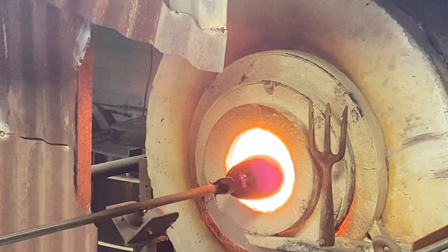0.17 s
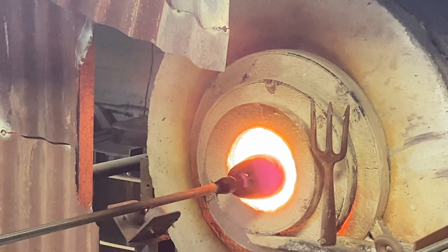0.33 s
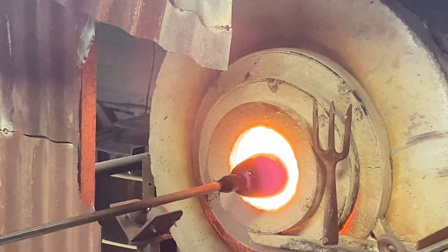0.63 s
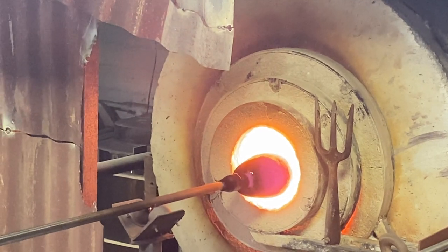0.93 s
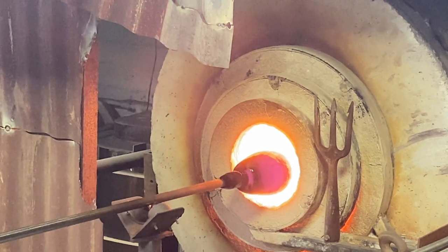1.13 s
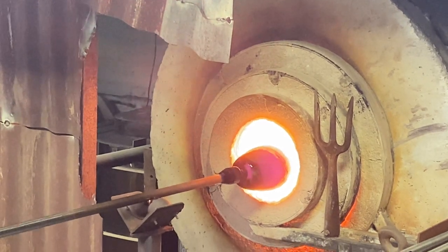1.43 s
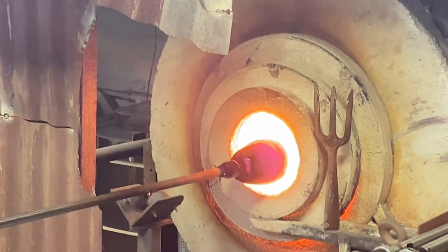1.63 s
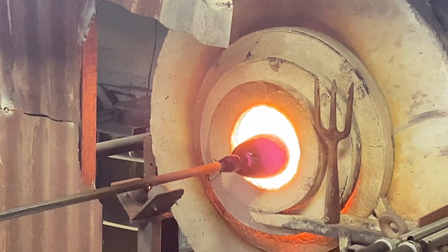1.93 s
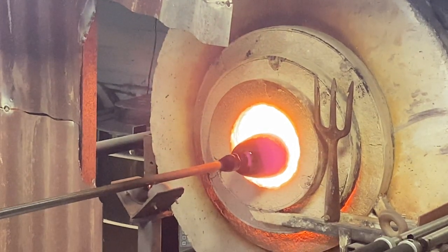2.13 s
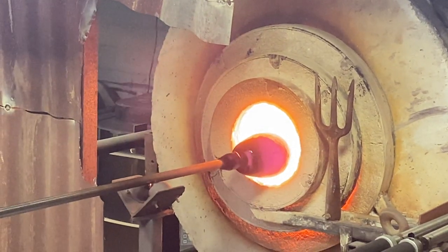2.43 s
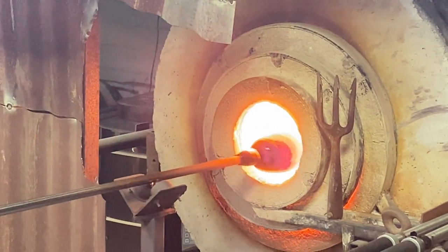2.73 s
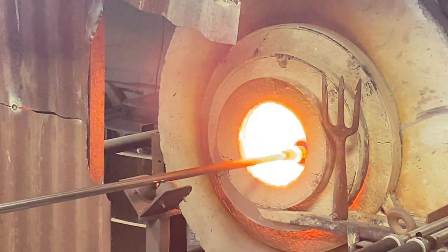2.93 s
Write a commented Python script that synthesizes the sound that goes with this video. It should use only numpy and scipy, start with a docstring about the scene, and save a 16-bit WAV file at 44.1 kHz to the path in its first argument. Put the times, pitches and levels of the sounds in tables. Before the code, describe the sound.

A gas-fired glass furnace roars close by throughout, with a throbbing low rumble, a steady blower hum and a soft hiss. A steel blowpipe turning on its rest makes faint scuffs in the first half second and rubs lightly from about 1.2 to 1.9 seconds, with a sharper scuff near 1.7. From 2.6 seconds the pipe slides in with a ringing scrape, loudest near 2.9 and lasting to the end.

```python
"""A glass workshop, close to a gas-fired furnace. The turbulent gas jet hisses, the blower hums at its
blade tone, and combustion noise roars and booms in the resonances of the chamber and the furnace mouth.
A steel blowpipe turns on its rest with a few light scuffs, then is pushed into the furnace with one long
ringing scrape, as stick-slip friction excites the pipe's modes."""
import sys
import numpy as np
from scipy import signal
from scipy.fft import rfft, irfft, next_fast_len
from scipy.io import wavfile
from scipy.ndimage import map_coordinates

SR = 44100
rng = np.random.default_rng(int(sys.argv[2]) if len(sys.argv) > 2 else 0)


def waveform_to_disk(signal):
    """Save audio, clipped to [-1, 1], as 16-bit WAV at the path in sys.argv[1]."""
    frames = np.transpose(np.atleast_2d(signal))
    scaled = np.clip(frames, -1, 1) * 32767
    samples = np.round(scaled).astype(np.int16)
    wavfile.write(sys.argv[1], SR, samples)


N = 136269
TIME_S = np.arange(N) / SR


def amp(db):
    """Amplitude ratio of a level in decibels."""
    return 10 ** (np.asarray(db) / 20)


def unit(x):
    """Normalisation to an rms of 1."""
    return x / np.sqrt(np.mean(x ** 2) + 1e-20)


def along(points, hz):
    """Interpolation of (Hz, value) points on a logarithmic frequency axis."""
    f, value = np.transpose(points)
    return np.interp(np.log(hz + 1), np.log(f + 1), value)


def wobble(knots_per_s):
    """Smooth random modulation: a spline through Gaussian knots."""
    knots = rng.standard_normal(int(N * knots_per_s / SR) + 4)
    return map_coordinates(knots, [TIME_S * knots_per_s])


def filtered(x, response):
    """Linear filtering: the spectrum of x times a complex frequency response."""
    size = next_fast_len(N + SR // 2)
    return irfft(rfft(x, size) * response(np.fft.rfftfreq(size, 1 / SR)), size)[..., :N]


def resonance(f, hz, width):
    """Response of two identical damped resonators in cascade, each of the given bandwidth in Hz."""
    return (1j * f * width / (hz * hz - f * f + 1j * f * width)) ** 2


def noise():
    """Two uncorrelated white noises."""
    return rng.standard_normal((2, N))


def coloured(x, spectrum):
    """Spectral shaping of x by (Hz, dB) points, at an rms of 1."""
    return unit(filtered(x, lambda f: amp(along(spectrum, f))))


def gas_jet():
    """Turbulence in the stream of gas and air radiates a nearly steady broadband hiss."""
    # Each row: frequency in Hz, relative spectral density in dB.
    hiss_spectrum = [(300, -4), (900, 6), (1400, 3), (2400, -3), (3600, -7.5), (4100, -8), (5500, -8),
                     (7500, -14.5), (11000, -23), (16000, -34)]
    level_db = -44.5 + 0.13 * wobble(5.7)
    return amp(level_db) * coloured(noise(), hiss_spectrum)


def blower():
    """Periodic blade passage gives a tone, slightly unsteady in pitch and level."""
    blade_hz = 356.6 + 0.97 * wobble(10)
    level_db = -31.5 + .4 * wobble(8.2)
    phase = 2 * np.pi * np.cumsum(blade_hz) / SR
    return amp(level_db) * np.sqrt(2) * np.array([np.sin(phase), np.cos(phase)])


def forced_modes(modes):
    """Forced resonance: independent combustion noise drives each mode of a table."""
    return sum(amp(db) * unit(filtered(noise(), lambda f: resonance(f, hz, 1.295 * width)))
               for hz, width, db in modes)


def chamber_throb():
    level_db, compression = -25, .35
    analytic = signal.hilbert(filtered(noise(), lambda f: resonance(f, hz=116.6, width=27.4)))
    envelope = np.abs(analytic) + 1e-9
    return amp(level_db) * unit(analytic.real / envelope ** compression)


def flame():
    """Combustion noise roars and excites cavity resonances; the bass swells and sinks with the boom."""
    # Each row: frequency in Hz, relative spectral density in dB.
    roar_spectrum = [(20, -16), (42, -9), (58, -3.5), (90, -4), (150, -3.5), (200, -6), (235, -9),
                     (330, -6.5), (385, -13), (520, -16), (580, -21), (700, -18.5), (900, -41),
                     (1300, -58.5)]
    # Each row: time in seconds, boom contour in dB, whose swings are scaled down below.
    boom_contour = [(0.0, -20.5), (0.28, -29.5), (0.38, -20.5), (0.42, -32), (0.47, -19), (0.51, -25),
                    (0.73, -25.5), (0.82, -21.5), (1.23, -25), (1.29, -16), (1.32, -36.5), (1.38, -14),
                    (1.41, -30), (1.45, -17), (1.63, -31.5), (1.65, -20), (1.74, -28.5), (1.77, -18.5),
                    (1.87, -30.5), (1.95, -29), (1.97, -22), (2.13, -26), (2.17, -17.5), (2.37, -21),
                    (2.41, -33.5), (2.49, -21.5), (2.51, -30), (2.57, -17), (2.62, -29), (2.75, -24),
                    (2.83, -40), (2.87, -24.5), (2.97, -23.5), (3.03, -26.5), (3.07, -17.5), (3.09, -21)]
    # The chamber's weaker resonances. Each row: frequency in Hz, nominal width in Hz, level in dB.
    chamber_modes = [(66.3, 19, -33), (86.2, 6.1, -36), (145.4, 9.8, -39.5)]
    # Burner and furnace mouth. Each row: frequency in Hz, nominal width in Hz, level in dB.
    mouth_modes = [(270.2, 6.8, -43.5), (294.8, 6.7, -40), (641, 27.4, -44), (737, 85, -41.5),
                   (1190, 156, -49), (1578, 72, -48.5), (1934, 450, -49.5), (3225, 710, -51)]
    swing_db = np.interp(TIME_S, *np.transpose(boom_contour))
    swing_db -= swing_db.mean()
    roar = amp(-28) * coloured(noise(), roar_spectrum)
    low_roar = filtered(roar, lambda f: 1 / (1 + (f / 180) ** 8))
    rumble = amp(.45 * swing_db) * (low_roar + forced_modes(chamber_modes))
    throb = amp(.9 * swing_db) * chamber_throb()
    return rumble + throb + (roar - low_roar) + forced_modes(mouth_modes)


def slips(per_s):
    """Stick-slip friction of steel on steel: random impulses of either sign and log-normal size."""
    scatter_db = 2.5
    occurs = rng.random((2, N)) < per_s / SR
    return occurs * rng.choice([-1, 1], (2, N)) * amp(scatter_db * noise())


def pipe_turning():
    """Friction of the pipe rolling on its rest: sparse slips make a faint, scratchy rub."""
    # Each row: time in seconds, level in dB.
    rub_levels = [(1.15, -75), (1.29, -60), (1.45, -54), (1.56, -64), (1.66, -54.5), (1.79, -58),
                  (1.9, -72)]
    # Each row: frequency in Hz, relative spectral density in dB.
    rub_spectrum = [(2000, -12), (4500, 6), (7500, -3), (11000, -8), (15500, -10)]
    level_db = np.interp(TIME_S, *np.transpose(rub_levels), left=-120, right=-120)
    return amp(level_db) * coloured(slips(per_s=1200), rub_spectrum)


def pipe_scuffs():
    """Friction transients of the turning pipe: bursts of slips rise sharply and decay exponentially."""
    # Each row: start in seconds, level in dB, centre in Hz, resonator width in Hz, T60 in seconds.
    scuffs = [(.058, -66, 13500, 5000, .17), (.243, -56, 10800, 4500, .12), (.424, -58, 14600, 5500, .19),
              (1.2, -66, 14000, 5000, .12), (1.42, -60, 12500, 6000, .16), (1.631, -59, 11020, 2500, .16),
              (1.693, -39.5, 5000, 5000, .27), (1.915, -64, 14200, 4000, .17)]
    attack_s = .004
    out = np.zeros((2, N))
    for start, db, hz, width, t60 in scuffs:
        age = np.maximum(TIME_S - start, 0)
        rub = unit(filtered(slips(per_s=4500), lambda f: resonance(f, hz, width)))
        out += amp(db - 60 * age / t60) * (1 - np.exp(-age / attack_s)) * rub
    return out


def pipe_push():
    """Stick-slip chatter excites the pipe's modes; the ring grows faster with effort than the dry grit."""
    # Each row: time in seconds, sliding effort in dB.
    effort = [(2.59, -50), (2.625, -27), (2.645, -17), (2.70, -11), (2.76, -5), (2.82, -4), (2.88, 0),
              (2.99, -2.5), (3.02, -5), (3.09, -8)]
    # Strong modes of the pipe on its rest. Each row: frequency in Hz, relative level in dB.
    pipe_modes = [(646, -3), (760, -3.5), (818, 0), (1040, -1), (1073, 2), (1119, 0.5), (1214, -5),
                  (1400, -5), (1536, -1), (1647, 0.5), (1739, -3), (2444, -13), (2681, -6), (3305, -11.5),
                  (4470, -12), (4651, -11.5), (4810, -15), (5324, -13.5), (5960, -12.5), (6072, -12),
                  (6540, -13), (6750, -13.5), (6917, -16), (7490, -15.5), (8750, -21), (11143, -17)]
    # Its many weaker modes. Each row: frequency in Hz, relative spectral density in dB.
    body_spectrum = [(300, -3.5), (560, -3), (720, 2.5), (920, 2), (1100, 2.5), (1420, 0), (1750, -1),
                     (2100, -11.5), (2800, -6), (3050, -10.5), (3400, -8), (3900, -13.5), (5600, -16),
                     (7400, -18), (8500, -23), (16000, -26)]
    # Dry grit at the contact. Each row: frequency in Hz, relative spectral density in dB.
    grit_spectrum = [(1000, -26), (3000, 2.5), (7000, -2), (9500, -2), (11000, 6.5), (12500, -4),
                     (14000, -2), (15300, 5)]
    slips_per_s, body_t60_s = 9000, 0.16
    chatter_db = .9 * wobble(55)
    effort_db = np.interp(TIME_S, *np.transpose(effort), left=-120) + chatter_db
    # Densely overlapping modes have decaying noise as their impulse response.
    t = np.arange(SR // 3) / SR
    body_response = rng.standard_normal((2, len(t))) * amp(-60 * t / body_t60_s)
    body = signal.fftconvolve(slips(slips_per_s), body_response, axes=1)[:, :N]
    body = coloured(body, body_spectrum)
    modal_response = lambda f: sum(amp(db) * resonance(f, hz, width=30.5 + .001 * hz)
                                   for hz, db in pipe_modes)
    tones = unit(filtered(slips(slips_per_s), modal_response))
    ring = amp(-25.5 + 0.94 * effort_db) * unit(tones + amp(3) * body)
    grit = amp(-36 + 0.8 * effort_db) * coloured(slips(slips_per_s), grit_spectrum)
    return ring + grit


def scene():
    """Superposition of all sources, their power divided between mid and side by frequency."""
    # Stereo width. Each row: frequency in Hz, side minus mid in dB.
    spread = [(60, -42), (130, -16), (300, -14.5), (650, -12), (1100, -8), (1600, -4), (2400, -16),
              (3300, -14.5), (4000, -55), (6800, -45), (7800, -35), (11000, -38), (15000, -6)]
    sources = flame() + gas_jet() + blower() + pipe_push() + pipe_turning() + pipe_scuffs()
    angle = lambda f: np.arctan(amp(along(spread, f)))
    mid, side = filtered(sources, lambda f: np.array([np.cos(angle(f)), np.sin(angle(f))]))
    return np.array([mid + side, mid - side])


def record(dry):
    """Level and phase differences between the left and right channels, within a limited frequency band."""
    # The bass leans right. Each row: frequency in Hz, left minus right in dB.
    balance = [(250, -1.25), (700, -.45), (1500, -.2), (3800, 0)]
    # Each row: frequency in Hz, phase lead of the left channel in radians.
    midrange_lead = [(100, 0), (650, 0), (1400, .42), (2400, 0), (3100, 0.26), (3800, 0)]
    # Each row: frequency in Hz, phase lag of the left channel in cycles.
    treble_lag = [(7350, 0), (9050, .5), (13300, 1.5), (15400, 2)]
    low_cut_hz, top_hz, fade_s = 54.5, 15800, .004
    split = np.array([[.5], [-.5]])
    gain = lambda f: amp(split * along(balance, f))
    phase = lambda f: split * (along(midrange_lead, f) - 2 * np.pi * along(treble_lag, f))
    band = lambda f: (f / low_cut_hz) ** 4 / np.sqrt(1 + (f / low_cut_hz) ** 8) * (f < top_hz)
    fade = signal.windows.tukey(N, 2 * fade_s * SR / N)
    return filtered(dry * fade, lambda f: gain(f) * np.exp(1j * phase(f)) * band(f))


dry = scene()
out = record(dry)
waveform_to_disk(out)
```